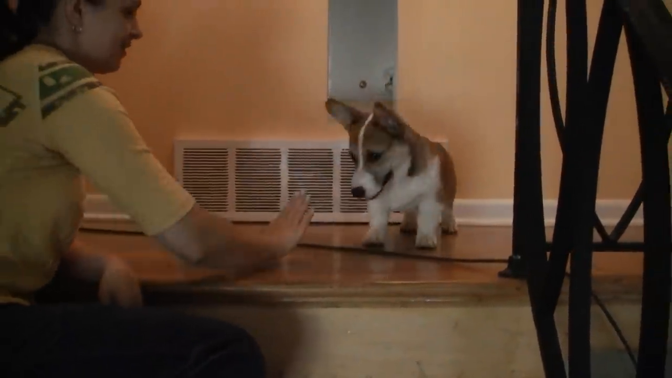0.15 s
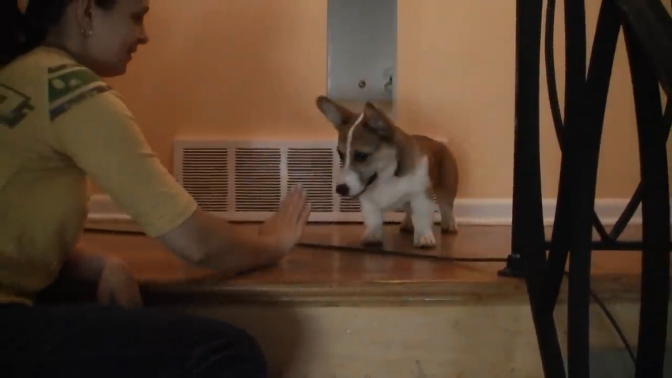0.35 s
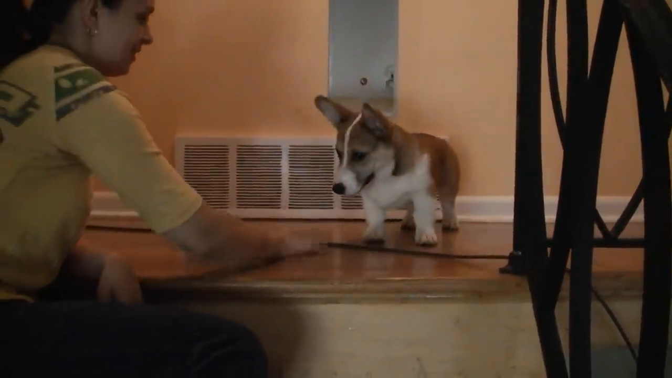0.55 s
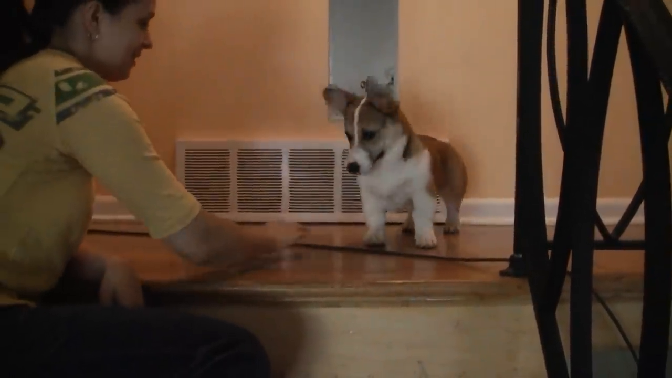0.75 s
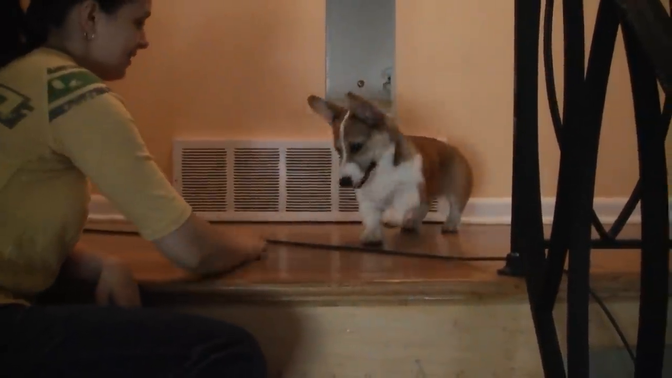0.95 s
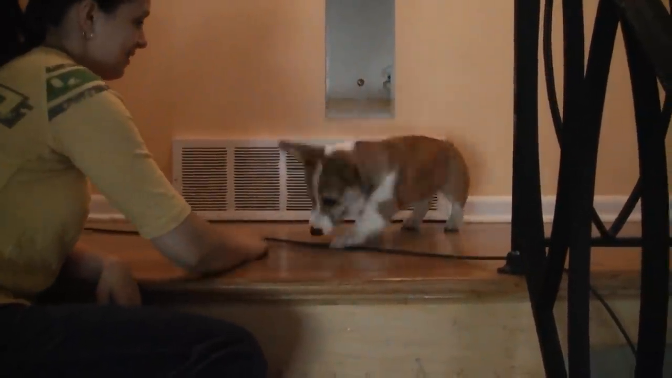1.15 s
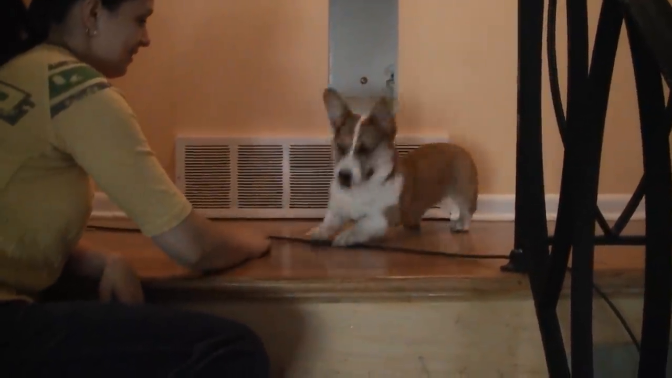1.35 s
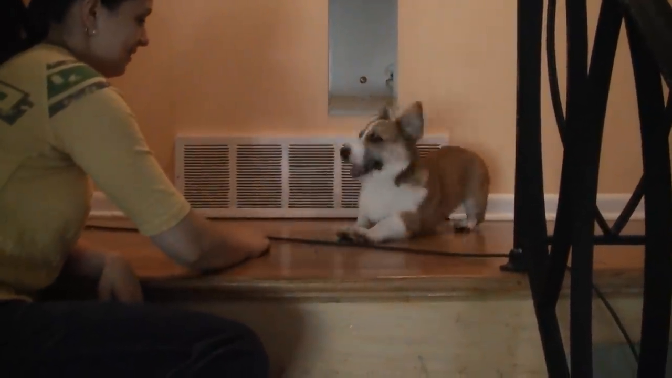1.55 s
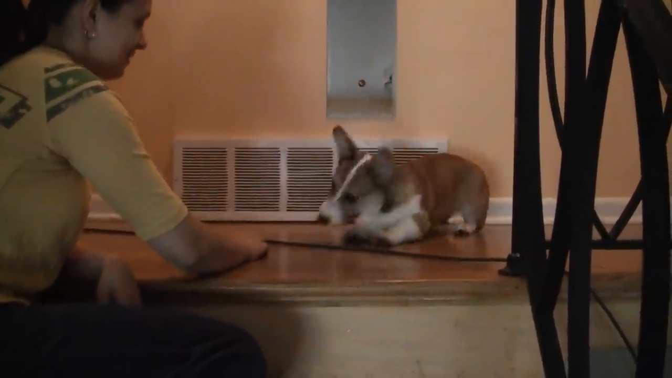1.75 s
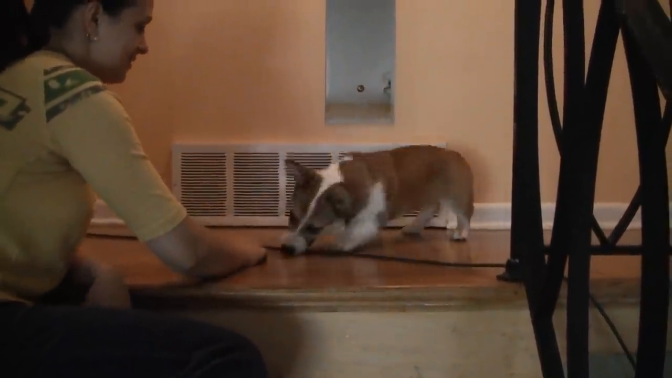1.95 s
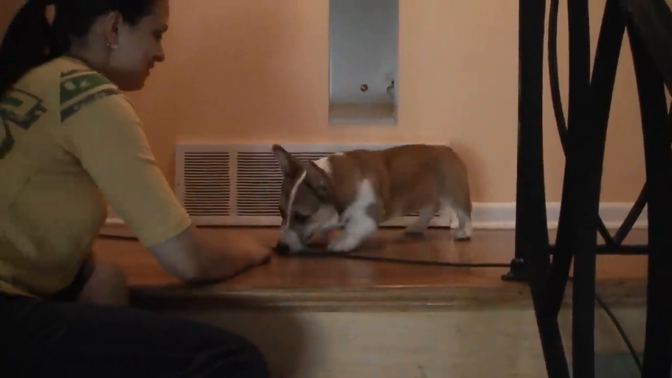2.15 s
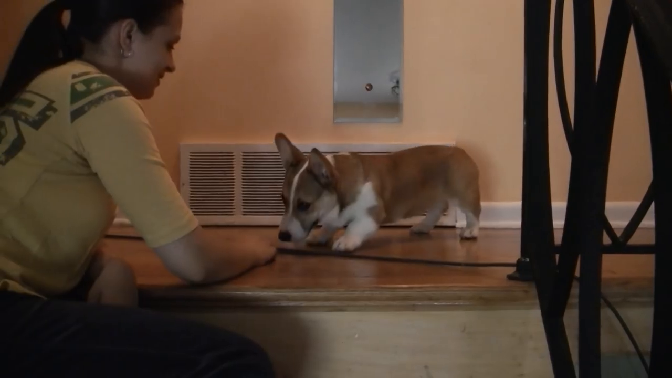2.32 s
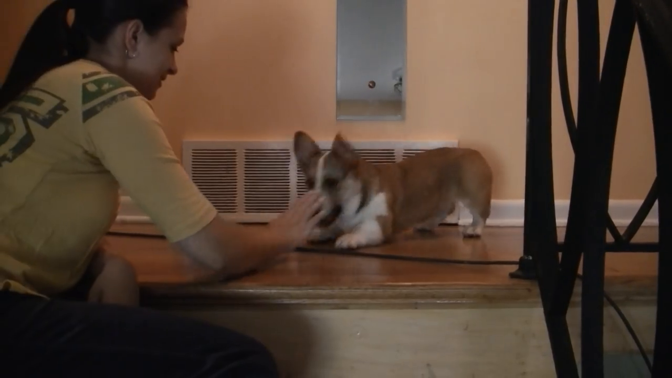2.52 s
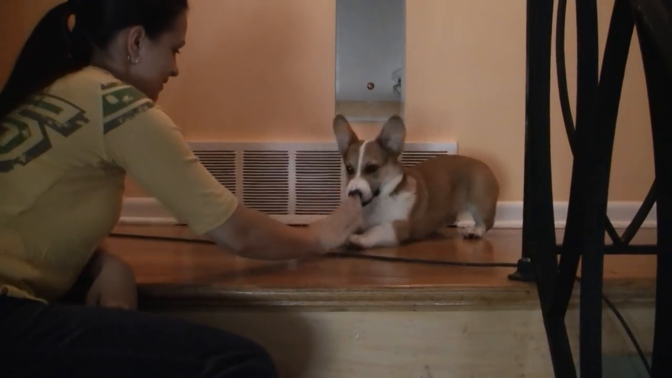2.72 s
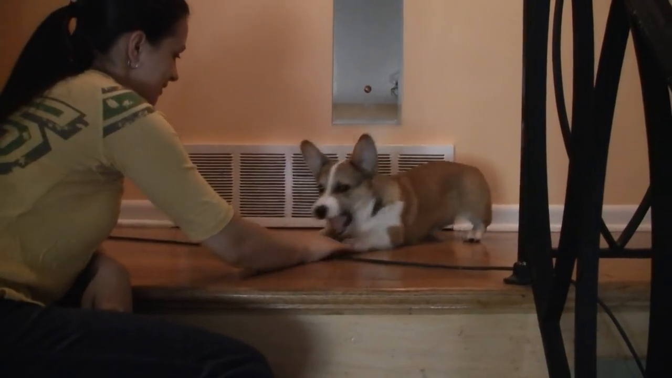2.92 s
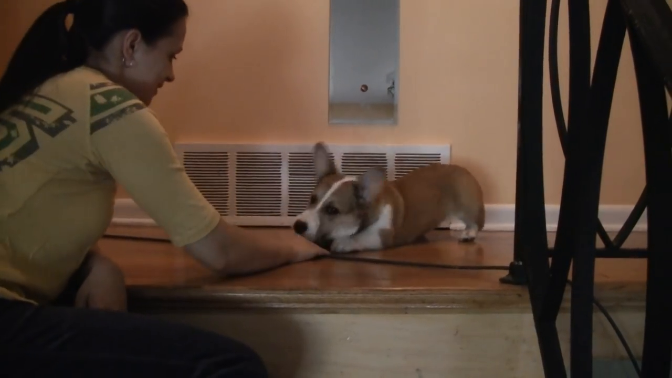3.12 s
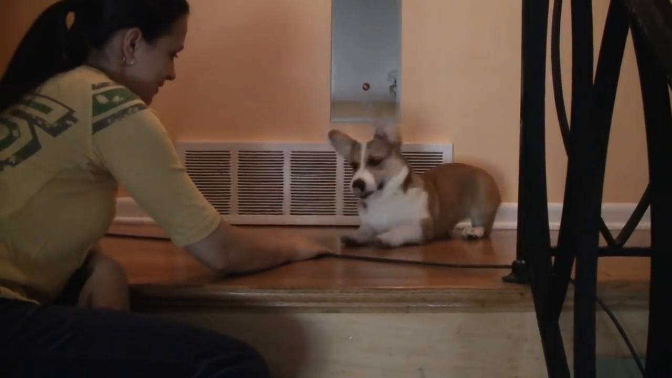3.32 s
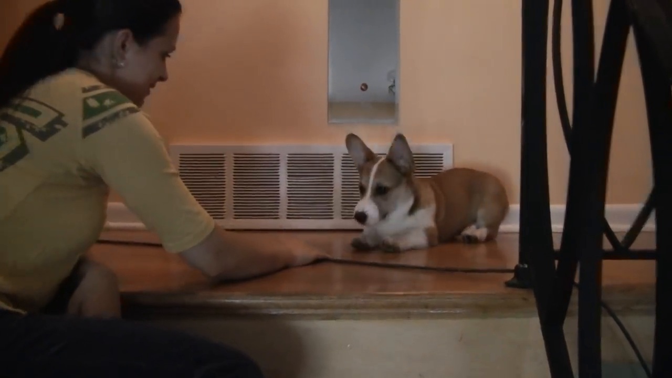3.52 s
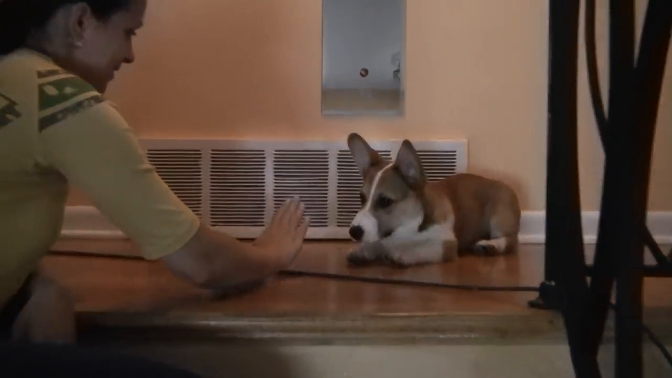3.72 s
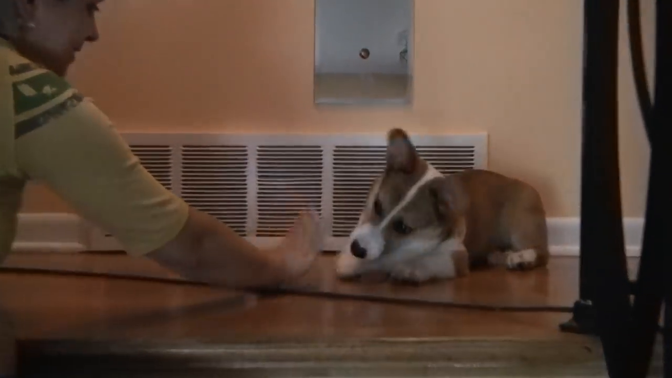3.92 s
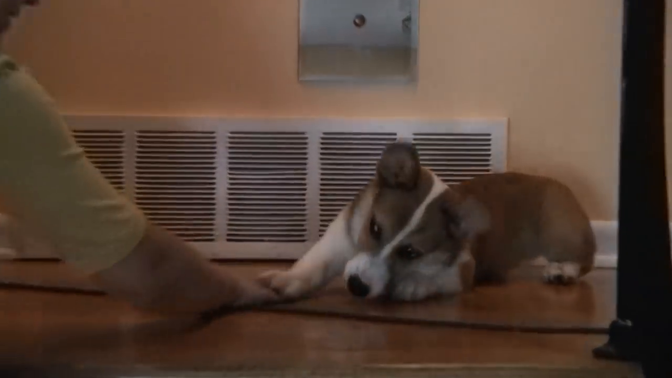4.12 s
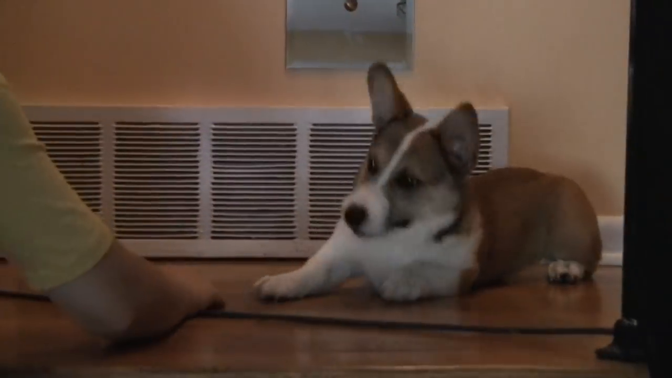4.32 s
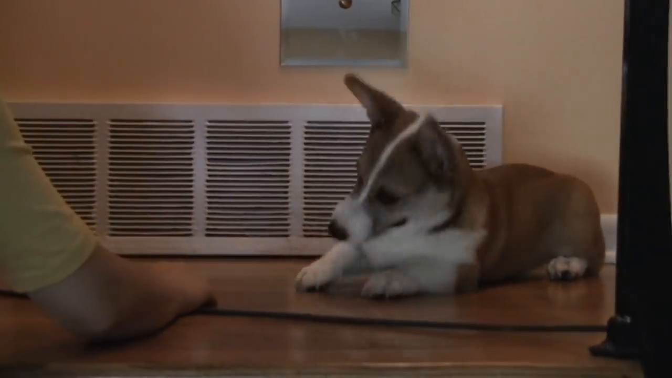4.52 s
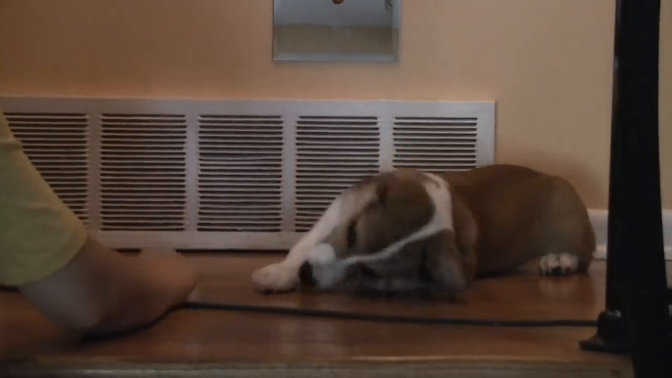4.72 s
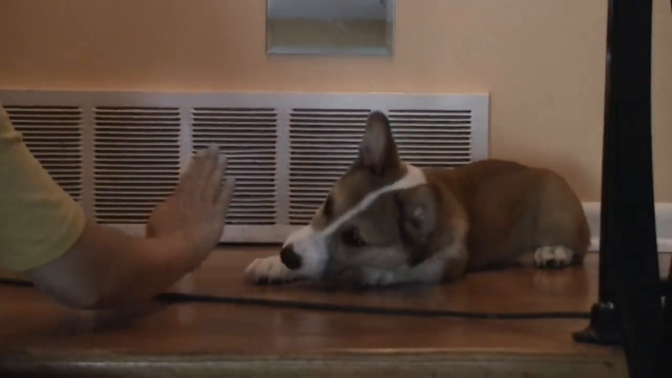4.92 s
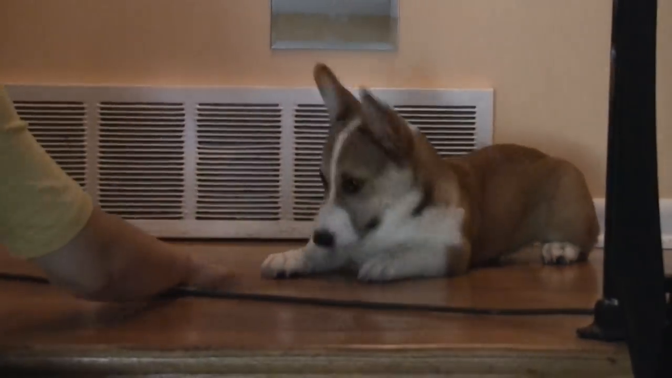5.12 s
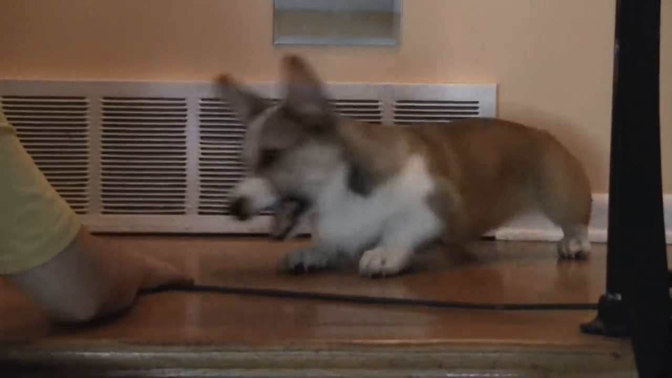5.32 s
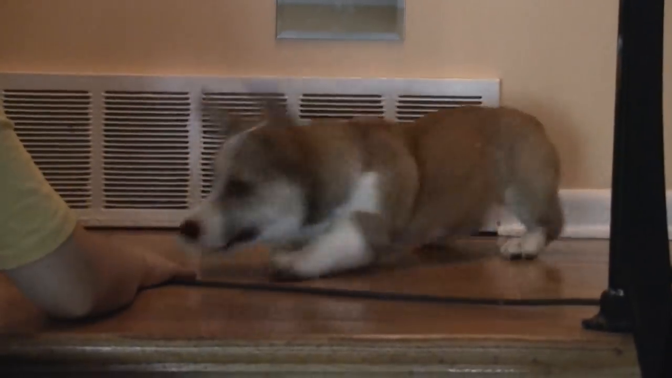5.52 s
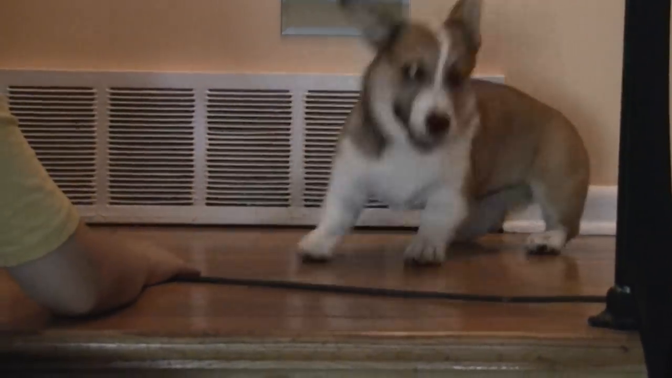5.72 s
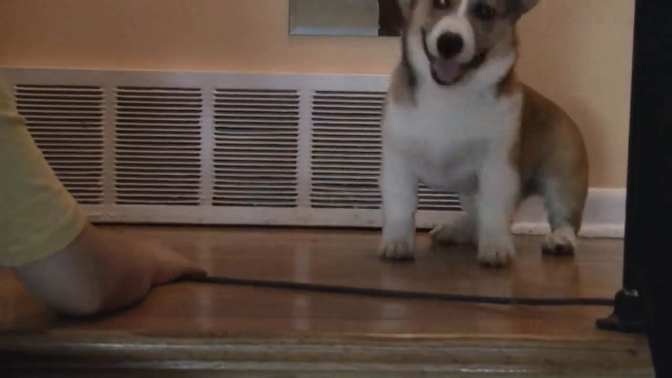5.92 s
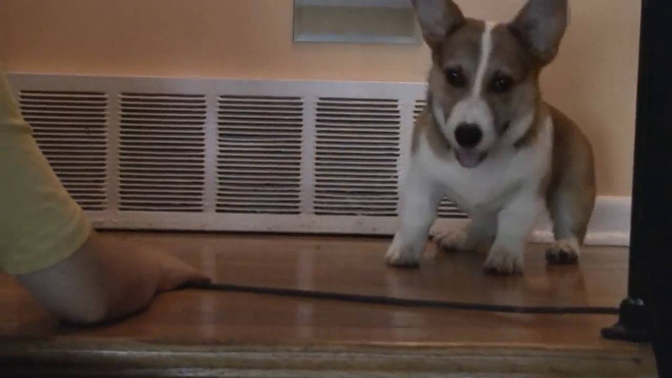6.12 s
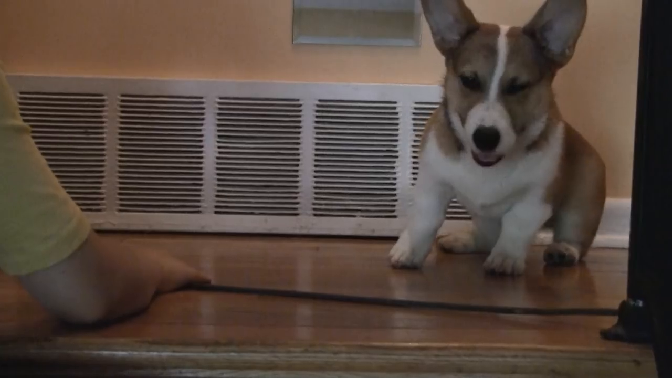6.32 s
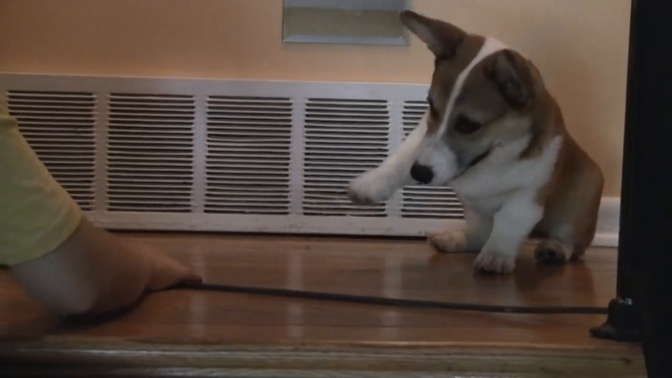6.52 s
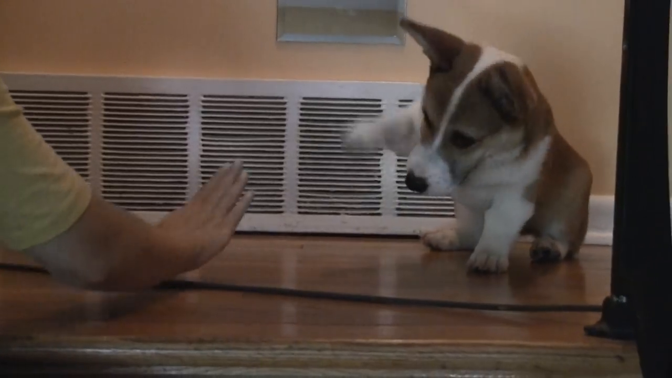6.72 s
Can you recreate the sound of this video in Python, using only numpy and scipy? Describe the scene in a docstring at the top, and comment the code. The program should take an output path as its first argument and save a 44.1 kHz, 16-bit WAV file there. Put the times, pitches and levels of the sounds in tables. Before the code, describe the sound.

Soft ventilation murmurs throughout in a bare, echoing room, heard from a few steps away. At about 0.5 seconds a palm slaps a hollow wooden floor. From 1 to 1.5 seconds a puppy pounces in a quick cluster of paw thumps, with claw ticks, scuffs and a brief rasping pad squeak. It snuffs through its nose at about 1.5 and 2 seconds, among lighter paw taps. Another slap lands near 2.8 seconds, followed by soft paw bumps and a faint slide. The loudest slap comes just before 4 seconds, then scattered paw thuds, scuffs and ticks, and a sharp slap at 5 seconds. From 5.3 to 5.6 seconds the puppy scrambles again with firm thumps, scraping claws and a short squeak. A few faint claw ticks trail off by 6.5 seconds, leaving only the air.

```python
"""Puppy and hand on a wooden floor.

A puppy plays with a hand on raised hardwood in a bare, echoing room. Palm slaps and pouncing paws
ring the hollow boards, claws tick on the varnish, and pads scuff and squeak as they grip and slip.
The puppy snuffs through its nose. Two microphones listen a few steps away, over soft ventilation."""
import sys
import numpy as np
from scipy import signal
from scipy.fft import rfft, irfft, next_fast_len
from scipy.io import wavfile
from scipy.ndimage import uniform_filter1d

SR = 44100
rng = np.random.default_rng(int(sys.argv[2]) if len(sys.argv) > 2 else 0)


def store_pcm(level_fs):
    """Save levels as 16-bit WAV."""
    pcm = np.round(np.clip(level_fs, -1, 1) * 32767).astype(np.int16)
    wavfile.write(sys.argv[1], SR, np.atleast_2d(pcm).T)


N = 302526
SIZE = 32768  # samples per event
T = np.arange(SIZE) / SR
HZ = np.fft.rfftfreq(SIZE, 1 / SR)
FIRM_DB = -41.5  # level of a firmly pressed paw


def amp(db):
    """Decibels to gain."""
    return 10 ** (np.asarray(db) / 20)


def unit(x):
    """Scale to rms 1."""
    return x / np.sqrt(np.mean(x ** 2) + 1e-20)


def along(points, hz):
    """Interpolate (Hz, value) points on a log axis."""
    point_hz, values = np.transpose(points)
    return np.interp(np.log(hz + 1), np.log(point_hz), values)


def filtered(x, response):
    """Zero-phase filter by a function of frequency."""
    n = x.shape[-1]
    padded = next_fast_len(n + 8192)
    return irfft(rfft(x, padded) * response(np.fft.rfftfreq(padded, 1 / SR)), padded)[..., :n]


def ring(x, gain):
    """Causal filter with the given gain on the HZ grid."""
    cepstrum = irfft(np.log(np.maximum(gain, 1e-6)))
    fold = np.r_[1, np.full(SIZE // 2 - 1, 2), np.zeros(SIZE // 2)]
    return irfft(rfft(x) * np.exp(rfft(cepstrum * fold)))


def hump(hz, width_oct):
    """Resonance curve on the HZ grid, peak gain 1."""
    return (1 + (np.log2((HZ + 1) / hz) / width_oct) ** 2 / 5) ** -3.2


def flatten(x, width_hz):
    """Level a burst's broad spectrum, keeping its fine grain."""
    bins = max(3, int(width_hz / HZ[1]))
    power = np.abs(uniform_filter1d(np.abs(rfft(x)) ** 2, bins))
    return ring(x, 1 / np.sqrt(power + 1e-9))


def wander(top_hz):
    """Low-passed noise, rms 1."""
    return unit(filtered(rng.standard_normal(SIZE), lambda hz: hz < top_hz))


def stroke(length_s, attack_s=0.0044, release_s=0.015):
    """Envelope of a rub or puff: rise, hold, fall."""
    return np.clip(T / attack_s, 0, 1) * np.clip((length_s - T) / release_s + .5, 0, 1)


def stereo(pair, spread):
    """Mid and side to left and right; spread sets side dB by frequency."""
    side = filtered(pair[1], lambda hz: amp(along(spread, hz)))
    return np.array([pair[0] + side, pair[0] - side])


def add(track, start_s, sound):
    """Mix an event into the track."""
    part = track[:, round(start_s * SR):][:, :SIZE]
    part += sound[:, :part.shape[1]]


def in_room(x, direct_db):
    """Direct sound plus a fresh tail of wall echoes; mid rms 1 over the loudest 40 ms."""
    # Room decay. Each row: frequency in Hz, T60 in seconds.
    decay = [(70, 0.081), (200, 0.57), (600, 0.83), (1500, 0.72), (4000, 0.72), (8000, 0.49), (15000, 0.3)]
    # Echo width. Each row: frequency in Hz, side over mid in dB.
    spread = [(60, -41), (125, -34), (250, -15.5), (1000, -13.5), (2000, -10.5), (4000, -5), (8000, -2.5),
              (14000, 3)]
    hz, t, spectra = signal.stft(rng.standard_normal((2, SIZE)), SR, nperseg=256)
    fade = amp(-60 * t / along(decay, hz)[:, None])
    tail = signal.istft(spectra * fade, SR, nperseg=256)[1][:, :SIZE]
    tail *= 1 - np.exp(-T / 0.0013)  # echoes build up
    tail *= 1 + 0.43 * np.exp(-(T / 0.064) ** 2)  # near wall and boards answer first, strongest
    tail = stereo([flatten(channel, width_hz=49) for channel in tail], spread)
    heard = amp(direct_db) * x + signal.fftconvolve(x[None], tail, axes=1)[:, :SIZE]
    return heard / np.sqrt(uniform_filter1d(heard.mean(0) ** 2, size=1764).max())


def ventilation():
    """Steady murmur of air with a faint hiss."""
    # Air noise. Each row: frequency in Hz, relative density in dB.
    spectrum = [(15, -56), (25, -40), (91, -5.5), (133, -10), (204, -3), (240, -5.5), (359, -2), (389, -3),
                (469, -3), (1110, -12), (1200, -13), (2060, -18.5), (2920, -21.5), (3260, -23),
                (15500, -31.5)]
    # Stereo width. Each row: frequency in Hz, side over mid in dB.
    spread = [(60, -16), (180, -1), (550, -0.5), (1650, -1.5), (4970, -1), (15000, -0.5)]
    air = filtered(rng.standard_normal((2, N)), lambda hz: amp(along(spectrum, hz)))
    return amp(-62.5) * unit(stereo(air, spread))


def snuffs(nose_hz=1890, width_oct_per_s=10.2, flutter_hz=170):
    """Puffs of air resonate in the nose and flutter the nostrils; short ones whistle."""
    # Puffs. Each row: start in seconds, length in seconds, level in dB.
    puffs = [(0.919, 0.031, -62.5), (1.538, 0.03, -48.5), (2.005, 0.053, -52.5), (2.571, 0.056, -65.5)]
    # Nostril hiss. Each row: frequency in Hz, gain in dB.
    hiss = [(100, -43), (1000, -52), (3300, -15), (5000, -26), (6700, -20.5), (9000, -33), (15000, -43)]
    out = np.zeros((2, N))
    flutter = amp(0.86 * np.sin(2 * np.pi * flutter_hz * T))
    for start_s, length_s, db in puffs:
        air = rng.standard_normal(SIZE) * stroke(length_s) * flutter
        nose = np.hypot(hump(nose_hz, width_oct_per_s * length_s), amp(along(hiss, HZ)))
        add(out, start_s, amp(db) * in_room(ring(air, nose), direct_db=-4))
    return out


def squeaks(pad_hz=2010, sag=0.0715, pulse_s=.00005):
    """A braking pad grips and slips, one pulse per slip; slow, uneven slipping rasps."""
    # Skids. Each row: start in seconds, length in seconds, level in dB, initial slip rate in Hz.
    skids = [(1.046, 0.031, -60.5, 1960), (1.155, 0.043, -40, 177.9), (2.01, 0.016, -71, 1060),
             (5.61, 0.038, -45.5, 741.4)]
    out = np.zeros((2, N))
    for start_s, length_s, db, slip_hz in skids:
        roughness = .14 * np.sqrt(785 / slip_hz)
        width_oct = 0.59 * amp(0.24 * (db - FIRM_DB))  # narrower under a lighter pad
        slowing = 1 - sag * np.minimum(T / length_s, 1)
        rate_hz = slip_hz * slowing * (1 + roughness * wander(slip_hz / 3))
        phase = np.cumsum(rate_hz) / SR % 1
        slips = np.exp(-((phase - .5) / slip_hz / pulse_s) ** 2)
        rasp = ring((slips - slips.mean()) * stroke(length_s), hump(pad_hz, width_oct))
        add(out, start_s, amp(db) * in_room(rasp, direct_db=-2))
    return out


def scuffs_and_hiss(grains_per_s=830, jerk_hz=55.6, jerk_db=5.5):
    """Pads, claws and fur slide jerkily on wood; the first row is the brief high hiss of a snuff."""
    # Noise bursts. Each row: start in seconds, length in seconds, level in dB, pitch in Hz.
    bursts = [(0.913, 0.028, -77, 6940), (1.136, .11, -66, 7340), (1.241, 0.058, -52.5, 4030),
              (1.356, 0.16, -56.5, 1500), (1.454, 0.023, -68, 5050), (1.92, .057, -60, 4600),
              (3.005, 0.38, -71, 5230), (4.091, 0.17, -62.5, 5540), (4.421, .12, -59, 1970),
              (5.271, 0.084, -56, 1780), (5.391, 0.16, -63.5, 5500), (5.464, 0.16, -55.5, 4930)]
    out = np.zeros((2, N))
    for start_s, length_s, db, hz in bursts:
        grains = (rng.random(SIZE) < grains_per_s / SR) * rng.standard_normal(SIZE)
        jerks = amp(jerk_db * wander(jerk_hz))
        width_oct = 0.87 * np.sqrt(2280 / hz)  # higher bursts are narrower
        burst = ring(grains * jerks * stroke(length_s), hump(hz, width_oct))
        add(out, start_s, amp(db) * in_room(burst, direct_db=-4.5))
    return out


def click(db, hz, width_oct, direct_db, top_hz=12500):
    """A millisecond contact on varnish; bluntness limits the treble, the room adds the ring."""
    tap = flatten(rng.standard_normal(SIZE) * np.exp(-T / 0.0007), width_hz=800)
    blunt = 1 / np.sqrt(1 + (HZ / top_hz) ** 4)
    return amp(db) * in_room(ring(tap, hump(hz, width_oct) * blunt), direct_db)


def claw_ticks(width_oct=0.83):
    """Claws and fingertips tick; the room returns less of the higher ticks."""
    # Ticks. Each row: start in seconds, level in dB, pitch in Hz.
    ticks = [(.051, -68.5, 5100), (1.083, -60.5, 5560), (1.116, -57, 5460), (1.143, -53, 3070),
             (1.252, -52, 4650), (1.368, -59.5, 5430), (1.952, -62, 6800), (2.94, -55.5, 3960),
             (3.421, -64.5, 1930), (4.363, -58, 1450), (4.415, -66.5, 5400), (4.492, -58.5, 4670),
             (4.703, -50, 3980), (4.712, -53, 5200), (5.23, -61, 2700), (5.301, -64, 5240),
             (5.346, -48.5, 1630), (5.452, -58, 5750), (5.487, -49.5, 4800), (5.887, -62.5, 4950),
             (5.916, -57.5, 3060), (6.467, -71, 7560)]
    out = np.zeros((2, N))
    for start_s, db, hz in ticks:
        direct_db = -3 + 2 * np.log2(hz / 4000)
        add(out, start_s, click(db, hz, width_oct, direct_db))
    return out


def board_thud(db, weight_db, smack_db, contact_s, hollow_hz, direct_db, hollow_db=7):
    """Flesh rings the boards; weight lifts the bass, smack the treble, the spot its hollow note."""
    # Hollow floor modes. Each row: frequency in Hz, width in Hz, mean gain in dB.
    modes = [(124.4, 34, 0), (181.3, 17.3, 9), (235, 9.7, 4.5), (304.8, 20.8, 7.5), (348, 11, -1.5),
             (414, 38, 5), (523, 9.9, 2.5), (666, 32, -2.5), (788, 26, -4), (867, 30, 1.5),
             (1000.4, 19.5, 0.5), (1075, 96, -9), (1199, 17, -2), (1360, 127, -8), (1477, 11, -3.5),
             (1734, 31, -9.5), (2010, 22, -13.5), (2490, 4.1, -28)]
    # Broad thud between the modes. Each row: frequency in Hz, gain in dB.
    thud = [(35, -18), (60, -32), (85, -20.5), (130, -6), (400, 2.5), (1000, -5.5), (1700, -7.5),
            (2300, -13.5), (4500, -37), (12000, -39)]
    mode_hz, width_hz, mode_db = np.transpose(modes)
    shapes = 1 / (1 + ((HZ - mode_hz[:, None]) / width_hz[:, None]) ** 2) ** 2
    strengths = amp(mode_db + rng.normal(0, 4.5, len(modes)))  # each hit favours other modes
    radiation = 1 / np.sqrt(1 + (85 / (HZ + 1)) ** 6)  # boards too small for deep bass
    wood = radiation * np.sqrt(strengths ** 2 @ shapes + amp(along(thud, HZ)) ** 2)
    press = (1 - np.exp(-T / (1.02 * contact_s))) * np.exp(-T / contact_s)  # flesh flattens gradually
    force = flatten(rng.standard_normal(SIZE) * press, width_hz=63)
    bass = 1 / (1 + (HZ / 160) ** 6)
    treble = 1 - 1 / (1 + (HZ / 680) ** 4)
    colour_db = weight_db * bass + smack_db * treble + hollow_db * hump(hollow_hz, width_oct=0.33)
    return amp(db) * in_room(ring(force, wood * amp(colour_db)), direct_db)


def paw_landings(firm_contact_s=0.0065, direct_db=-6.5):
    """Two paws land on one spot; the second takes the body's weight, heavier and duller."""
    # Pounces. Each row: start in seconds, level in dB, second paw's lag in seconds,
    # bass lift in dB, treble lift in dB, hollow note in Hz.
    pounces = [(1.078, -44.5, .035, 11.5, 0.5, 383), (1.163, -39.5, .016, -8, 7.5, 191),
               (1.252, -38.5, .032, -5.5, 2, 192), (1.343, -41.5, .052, -3.5, 2, 1030),
               (1.497, -50.5, 0.011, -16, 0, 295), (1.895, -53, .035, 6.5, 7.5, 1460),
               (1.96, -54, .015, -4, 12.5, 169), (3.027, -51, .012, 8, 8, 1340),
               (3.056, -46, .022, -3.5, -2.5, 890), (4.055, -46, .015, -18, -11, 190),
               (4.183, -44.5, .015, -7, -1, 346), (4.53, -61, .012, -11, 0.5, 390),
               (4.697, -49, .007, -4, 11, 415), (5.343, -51.5, .01, -4, 8, 940),
               (5.431, -51, .02, -3, 9, 600), (5.464, -38, .021, 0, 1.5, 800),
               (5.515, -37.5, .015, -8.5, 1.5, 296), (5.601, -48.5, .015, -3, 1, 720)]
    out = np.zeros((2, N))
    for start_s, db, lag_s, weight_db, smack_db, hollow_hz in pounces:
        contact_s = firm_contact_s * amp(0.16 * (FIRM_DB - db))  # gentler paws sink in more slowly
        first = board_thud(db, weight_db, smack_db, contact_s, hollow_hz, direct_db)
        second = board_thud(db + 1.5, weight_db + 2.5, smack_db - 6, contact_s, hollow_hz, direct_db)
        add(out, start_s, first)
        add(out, start_s + lag_s, second)
    return out


def palm_slaps(contact_s=0.0036, crack_lag_s=.0013, crack_hz=3240, crack_width_oct=0.79):
    """A palm thuds on the boards; its skin cracks on the varnish as it flattens."""
    # Slaps. Each row: start in seconds, level in dB, bass lift in dB, treble lift in dB,
    # hollow note in Hz, crack level in dB, crack's direct gain in dB.
    slaps = [(.552, -40.5, 7.5, 0.5, 880, -60.5, -12), (2.758, -37.5, 2, 0, 810, -57.5, -16),
             (3.947, -29.5, -1, -6.5, 1630, -41, -4), (4.992, -33, 5, 1, 605, -42.5, 5)]
    out = np.zeros((2, N))
    for start_s, db, weight_db, smack_db, hollow_hz, crack_db, crack_direct_db in slaps:
        add(out, start_s, board_thud(db, weight_db, smack_db, contact_s, hollow_hz, direct_db=-9.5))
        add(out, start_s + crack_lag_s, click(crack_db, crack_hz, crack_width_oct, crack_direct_db))
    return out


def scene():
    """All sources at the microphones."""
    impacts = palm_slaps() + paw_landings() + claw_ticks()
    return impacts + scuffs_and_hiss() + squeaks() + snuffs() + ventilation()


def record(dry):
    """Two band-limited microphones, slightly unlike in colour."""
    # Microphone imbalance. Each row: frequency in Hz, left over right in dB.
    imbalance = [(125, 1.4), (300, -1), (2000, -1.6), (5000, 0.3), (9000, -2.5), (14000, 1)]
    top_hz = 15900
    coloured = filtered(dry, lambda hz: amp(np.outer([.5, -.5], along(imbalance, hz))))
    return filtered(coloured, lambda hz: hz < top_hz)


dry = scene()
out = record(dry)
store_pcm(out)
```